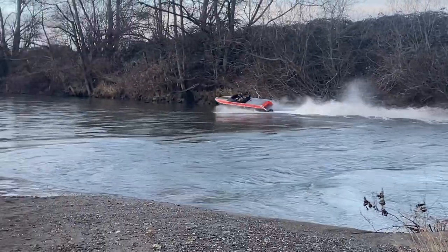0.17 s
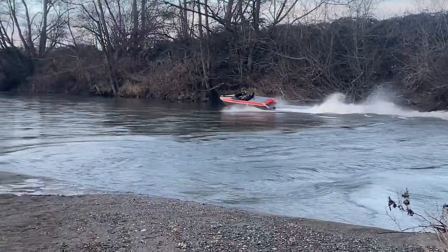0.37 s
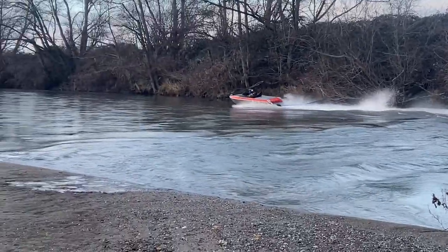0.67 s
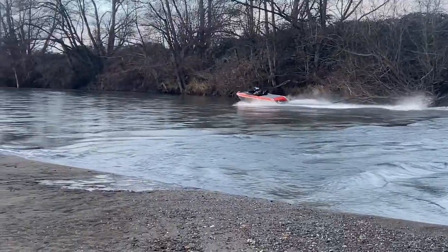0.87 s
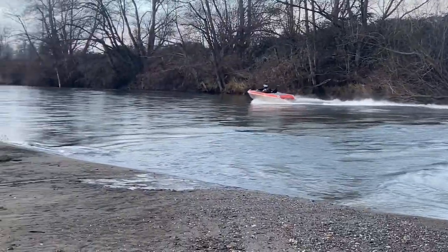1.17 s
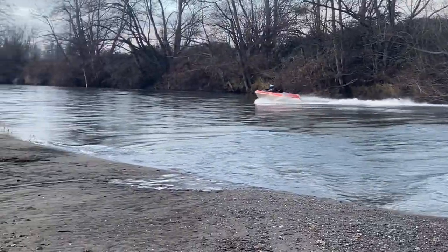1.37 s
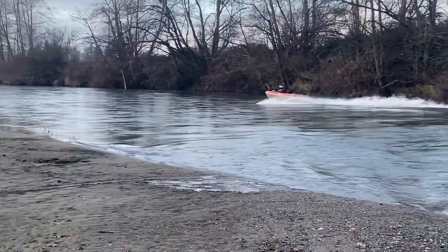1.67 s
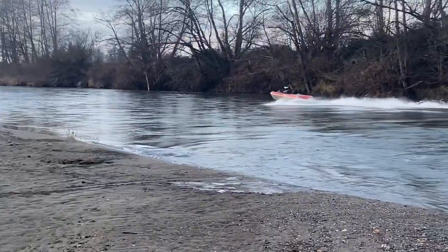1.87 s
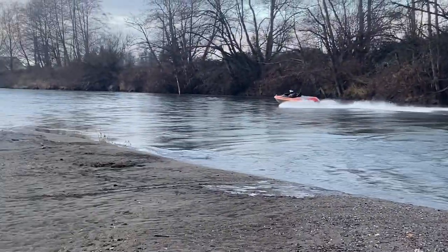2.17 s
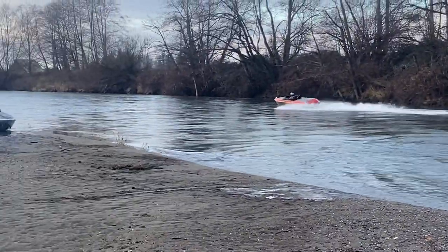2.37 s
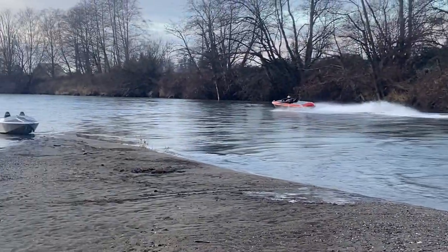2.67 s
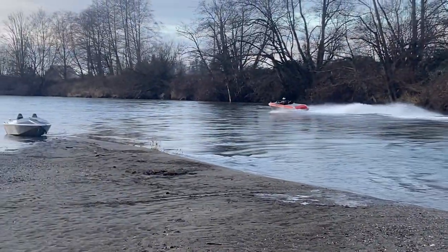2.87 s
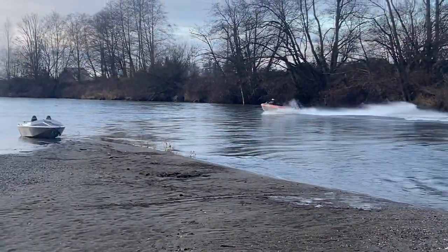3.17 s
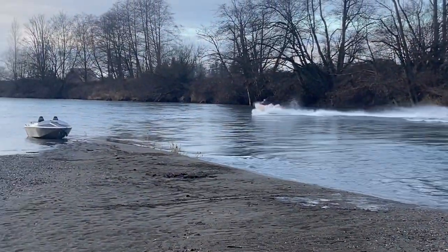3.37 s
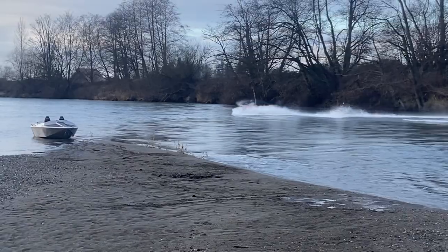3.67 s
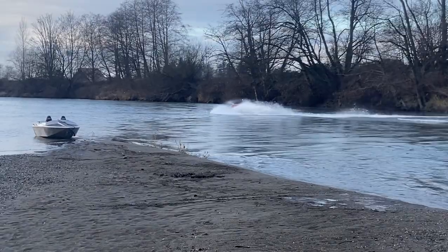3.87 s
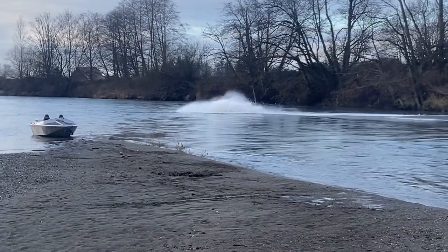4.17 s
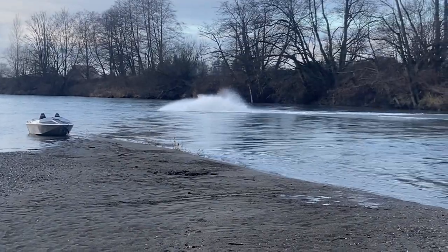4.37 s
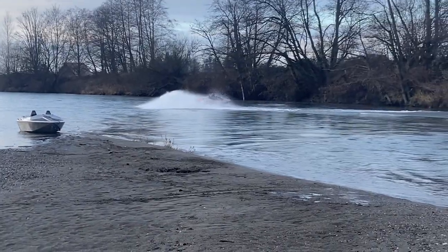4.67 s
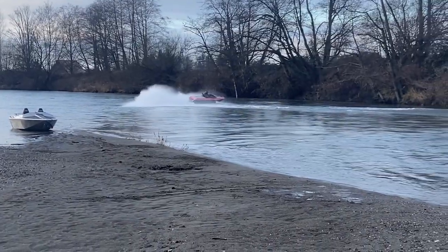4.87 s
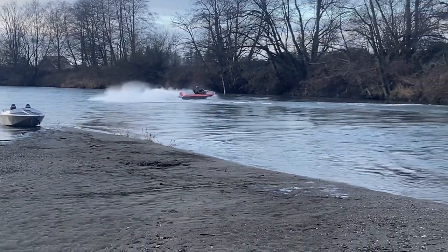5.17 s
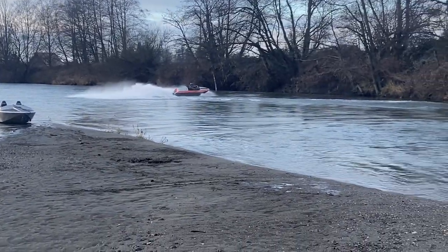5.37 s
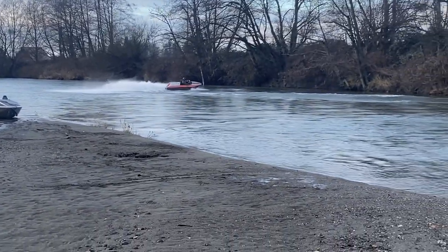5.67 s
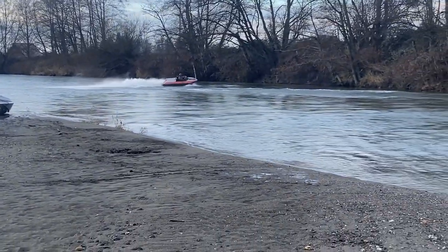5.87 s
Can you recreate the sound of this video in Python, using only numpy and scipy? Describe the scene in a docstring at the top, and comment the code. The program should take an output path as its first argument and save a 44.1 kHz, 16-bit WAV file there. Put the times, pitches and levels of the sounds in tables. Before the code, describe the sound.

Low, buzzing boat engine with watery burble hums steadily, surges in two throaty revs amid hissing spray, then drops to a steady run.

```python
"""A small jet boat runs along a river, revs up through a spinning turn and heads back, heard from a gravel bank.
Its exhaust is a stack of harmonics of the firing rate, roughened by unequal firings; sparse impacts
coloured low make its underwater burble, with a gulp at each plunge of the outlet.
Shaped noise gives the churning jet, the spray, the thrown sheets of water and the current over near stones.
The wooded far bank answers softly with a diffuse echo; a phone's stereo processing makes two channels of it."""
import sys
import numpy as np
from scipy import signal
from scipy.fft import rfft, irfft
from scipy.io import wavfile

SR = 44100
rng = np.random.default_rng(int(sys.argv[2]) if len(sys.argv) > 2 else 0)


def waveform_to_disk(signal):
    """Save audio, clipped to [-1, 1], as 16-bit WAV at the path in sys.argv[1]."""
    frames = np.transpose(np.atleast_2d(signal))
    scaled = np.clip(frames, -1, 1) * 32767
    samples = np.round(scaled).astype(np.int16)
    wavfile.write(sys.argv[1], SR, samples)


N = 265923
TIME = np.arange(N) / SR  # s
BINS = np.fft.rfftfreq(N, 1 / SR)  # Hz

# exhaust gas breaking through the water, before small trims: t/s, level/dB
BURBLE_LEVEL = [(0, -39.5), (.55, -32.5), (1.78, -39.5), (2.1, -33), (3.45, -28.5), (4.1, -33.5),
                (4.7, -26), (5.3, -32.5), (6.03, -30.5)]
# the outlet plunges under water and gulps: t/s, level/dB
PLUNGES = [(.56, -28), (2.6, -29.5), (3.03, -27), (3.47, -25), (3.78, -29), (4.76, -25), (5.14, -26),
           (5.66, -29)]
GULP_HALF_S = 0.024  # half length of a gulp, s


def amp(db):
    """Decibels to gain."""
    return 10 ** (np.asarray(db) / 20)


def unit(x):
    """Scales to rms 1."""
    return x / np.sqrt(np.mean(x ** 2) + 1e-20)


def curve(rows):
    """Reads a time table at every sample."""
    return np.interp(TIME, *np.transpose(rows))


def read(points, hz):
    """Reads a spectrum table on a log-frequency axis."""
    f, value = np.transpose(points)
    return np.interp(np.log(hz + 1), np.log(f + 1), value)


def colour(x, points):
    """Filters x by a spectrum table and scales it to rms 1."""
    spectrum = rfft(x) * amp(read(points, BINS))
    return unit(irfft(spectrum, N))


def bump(s, half_s):
    """A smooth swell of height 1 around one moment."""
    return np.exp(-((TIME - s) / half_s) ** 2)


def wander(rate_hz):
    """Slow random drift of rms 1: white noise rolled off above rate_hz."""
    spectrum = rfft(rng.standard_normal(N)) / (1 + (BINS / rate_hz) ** 4)
    return unit(irfft(spectrum, N))


def noise():
    """Two unrelated white noises: one that both channels share, one that sets them apart."""
    return rng.standard_normal((2, N))


def drops(per_s, spread_db):
    """Sparse impacts of random sign, a few of them large."""
    size = amp(spread_db * np.minimum(rng.exponential(1, (2, N)), 4))
    sign = np.sign(noise())
    struck = rng.random((2, N)) < per_s / SR
    return unit(size * sign * struck)


def far_bank(x, delay_s=0.06, t60_s=0.81):
    """Trunks and brush across the river scatter the engine back as a soft, diffuse tail."""
    t = TIME[:SR] - delay_s
    decay = (t > 0) * amp(-60 * abs(t) / t60_s)
    scattered = rng.random((2, SR)) < 1500 / SR  # about 1500 reflections a second
    taps = rng.standard_normal((2, SR)) * scattered * decay
    taps = taps / np.linalg.norm(taps[0])
    return signal.fftconvolve(x[None], taps, axes=1)[:, :N]


def ripples():
    """Shallow current fizzing over the gravel close by: noise with many small impacts."""
    # ripples on the near stones, before a 1.5 dB cut: t/s, level/dB
    ripple_level = [(0, -45), (.36, -45), (.5, -50), (1, -54), (3, -55.5), (6.03, -63.5)]
    # colour of the fizz: f/Hz, level/dB
    ripple_colour = [(300, -7.5), (1000, 2.5), (2200, -3.5), (3000, 0.5), (5300, 0), (7600, -1.5),
                     (9600, -7.5), (11200, -15), (14000, -21), (15700, -25.5)]
    fizz = noise() + 0.45 * drops(per_s=1600, spread_db=3.5)
    return colour(fizz, ripple_colour) * amp(curve(ripple_level) - 1.5)


def spray():
    """Countless far drops fall back on the river and merge into a hiss."""
    # hiss of the spray: t/s, level/dB
    spray_level = [(0, -47.3), (.9, -49.7), (2.7, -47.8), (3.0, -44.6), (3.68, -47), (3.92, -43.3),
                   (4.38, -47), (4.67, -44.5), (5.4, -45.5), (6.03, -48)]
    # colour of the hiss: f/Hz, level/dB
    spray_colour = [(400, -21), (1400, -8), (1900, -3), (2300, -4), (2650, 3), (3100, 2.5), (4200, -3),
                    (5200, -3.5), (6600, -11), (8000, -14.5), (9600, -19.5), (11000, -27), (14000, -33)]
    hiss = noise() + 0.35 * drops(per_s=2300, spread_db=3)
    return colour(hiss, spray_colour) * amp(curve(spray_level) + 0.52 * wander(15))


def splashes():
    """Each thrown sheet of water swells and fades in its own band of noise."""
    # sheets of water thrown up: t/s, half length/s, level/dB, centre f/Hz
    sheets = [(2.878, 0.17, -40, 940), (3.005, .14, -50, 5200), (3.328, 0.083, -52.5, 5200),
              (3.751, 0.27, -49.5, 1500), (3.914, 0.098, -52.5, 5400), (4.157, 0.054, -47.5, 4850),
              (4.099, 0.092, -46, 1100), (4.68, 0.15, -49.5, 1375)]
    out = np.zeros((2, N))
    for s, half_s, db, hz in sheets:
        band = np.exp(-(np.log2((BINS + 1) / hz) / 0.32) ** 2)  # width in octaves
        sheet = unit(irfft(rfft(noise()) * band, N))
        out += amp(db) * bump(s, half_s) * sheet
    return out


def churn(turns):
    """The roar of the jet: broad noise that throbs slightly with each firing."""
    # churning of the jet, strongest in the turn and at the end: t/s, level/dB
    churn_level = [(0, -39.8), (1.1, -39.7), (1.5, -41), (2.45, -41.7), (2.95, -37.8), (4.65, -38.5),
                   (5.2, -43.3), (6.03, -38)]
    # colour of the roar: f/Hz, level/dB
    churn_colour = [(40, -14), (150, 3.5), (300, 7), (500, 4), (700, 4.5), (1000, -1), (1300, -2.5),
                    (1650, -12.5), (2000, -17.5), (5000, -41.5)]
    throb = 1 + 0.24 * np.cos(turns)
    return colour(noise() * throb, churn_colour) * amp(curve(churn_level) + 0.8 * wander(10))


def burble():
    """Low, lumpy puffs of gas bursting out of the wake, with a short gulp at each plunge."""
    # colour of the puffs: f/Hz, level/dB
    burble_colour = [(15, -41.5), (30, -16.5), (45, -4), (65, 2), (90, 0.5), (125, 1.5), (200, -3.5),
                     (280, -8.5), (420, -16), (800, -34), (2000, -63.5)]
    puffs = colour(drops(per_s=300, spread_db=2), burble_colour)
    steady = amp(curve(BURBLE_LEVEL) + 1.2 + 1.5 * wander(6))
    gulps = sum(amp(db) * bump(s, GULP_HALF_S) for s, db in PLUNGES)
    return puffs * np.hypot(steady, gulps)


def lope(turns, hz):
    """Strong and weak firings alternate, which adds lines halfway between the harmonics."""
    # lope of the unequal cylinders as it stands at cruising speed: t/s, level/dB
    lope_level = [(0, -38), (2.45, -31.7), (3.6, -32), (5.3, -39), (6.03, -41)]
    # colour of the half-order lines: f/Hz, level/dB
    lope_colour = [(72, -13.5), (218, 1), (365, -12.5), (510, -18), (660, -23), (950, -26.5), (1500, -35)]
    cruise_hz, db_per_octave = 145, -33  # it evens out as the engine speeds up
    out = np.zeros(N)
    for k in np.arange(0.5, 8):
        level_db = read(lope_colour, k * hz) + 2.6 * wander(6)
        phase = k * turns + 0.3 * wander(12) + rng.uniform(0, 2 * np.pi)
        out += amp(level_db) * np.cos(phase)
    return np.sqrt(2) * amp(curve(lope_level) + db_per_octave * np.log2(hz / cruise_hz)) * out


def fading(order):
    """The dB that one harmonic loses while direct and reflected sound briefly cancel."""
    # cancellations: t/s, half length/s, depth/dB, harmonic number
    fades = [(0.129, .03, 14, 1), (.26, .02, 6, 1), (2.002, .035, 8.5, 1), (2.174, 0.026, 9, 1),
             (2.86, .018, 7, 1), (3.314, 0.024, 8, 1), (3.46, .015, 8, 1), (3.79, .017, 11, 1),
             (3.87, .025, 9, 1), (5.68, .03, 8, 1), (.11, .035, 10, 2), (0.598, 0.18, 6, 2),
             (1.14, 0.079, 20, 2), (1.487, .05, 12, 2), (2.13, .03, 9, 2), (2.71, .08, 22, 2),
             (3.334, 0.042, 8, 2), (3.5, .04, 12, 2), (5.29, 0.081, 14, 2), (5.516, 0.046, 9.5, 2),
             (5.87, 0.052, 13.5, 2), (3.5, .04, 10, 3), (1.55, .25, 11, 4), (.15, .08, 14, 5)]
    return sum(depth_db * bump(s, half_s) for s, half_s, depth_db, k in fades if round(k) == order)


def exhaust(turns, hz):
    """Harmonics of the firing rate; they shake when the outlet burbles under water."""
    # boom at the firing rate, swelling as the boat passes and turns: t/s, level/dB
    boom_level = [(0, -24), (.38, -27), (.64, -24.5), (.8, -21), (1.5, -15.2), (2.08, -21.5), (2.3, -34),
                  (2.58, -19.5), (2.78, -20.5), (2.95, -12), (3.1, -9.8), (3.46, -17), (3.72, -14),
                  (3.95, -21), (4.4, -9.4), (5.0, -15.7), (6.03, -21.5)]
    # bark of the open outlet, an octave up: t/s, level/dB
    bark_level = [(0, -33), (.9, -30.5), (2.3, -31.5), (3.0, -27), (3.5, -28), (3.95, -24.5), (4.45, -24),
                  (5.2, -34), (6.03, -31)]
    # snarl under load, on the third harmonic: t/s, level/dB
    snarl_level = [(0, -37.5), (.9, -40.5), (1.85, -54), (2.16, -38.5), (3.3, -38), (4.05, -32.3),
                   (4.55, -37), (4.85, -49), (6.03, -48.5)]
    # rasp of the fourth harmonic and up, before the pipe and a 1 dB cut: t/s, level/dB
    rasp_level = [(0, -42.5), (.8, -47), (1.4, -46), (1.95, -51.5), (2.95, -40.5), (3.4, -45), (3.55, -51),
                  (4.35, -50.5), (4.7, -58), (6.03, -49.5)]
    # how the pipe dulls the rasp: f/Hz, gain/dB
    pipe_gain = [(580, 0), (750, -2), (900, -8), (1130, -14), (1300, -23), (2000, -33)]
    # the outlet lifts clear of the water and the overtones flare: t/s, half length/s, gain/dB
    flares = [(.18, .07, 3), (0.89, .13, 4), (1.74, .1, 2.5), (2.267, 0.055, 3.5), (2.72, .09, 4),
              (2.96, .06, 3.5), (3.42, .03, 7), (3.97, 0.16, 3), (4.362, 0.055, 6), (5.32, .05, 5)]

    gulp_shake = 1 + 1.5 * sum(bump(s, GULP_HALF_S) for s, _ in PLUNGES)
    shake = amp(0.5 * (curve(BURBLE_LEVEL) + 35)) * gulp_shake
    flare_db = sum(db * bump(s, half_s) for s, half_s, db in flares)

    boom_db = curve(boom_level) - fading(order=1) + 0.6 * shake * wander(18)
    bark_db = curve(bark_level) + flare_db - fading(order=2) + 1.2 * shake * wander(12)
    snarl_db = curve(snarl_level) + flare_db - fading(order=3) + 1.6 * wander(8)
    out = amp(boom_db) * np.cos(turns + 0.045 * shake * wander(18))
    out += amp(bark_db) * np.cos(2 * turns + rng.uniform(0, 2 * np.pi))
    out += amp(snarl_db) * np.cos(3 * turns + rng.uniform(0, 2 * np.pi))
    # the high harmonics fade in and out one by one over the moving water
    for k in np.arange(4, 9):
        rasp_db = curve(rasp_level) + flare_db - fading(order=k)
        rasp_db += read(pipe_gain, k * hz) + 2.5 * wander(6.5) - 1.0
        phase = k * turns + 0.18 * shake * wander(24) + rng.uniform(0, 2 * np.pi)
        out += amp(rasp_db) * np.cos(phase)
    return np.sqrt(2) * out


def stereo_processing(pair):
    """The phone's stereo processing makes two nearly alike channels, shifted in phase and level."""
    # how alike the channels are: f/Hz, likeness (0 to 1)
    likeness = [(48, 0.93), (80, .9), (160, 0.92), (700, 0.92), (1200, 0.93), (1550, 0.25), (1950, 0.98),
                (3000, 0.94), (3500, 1)]
    # level between the channels: f/Hz, left minus right/dB
    tilt = [(100, 1), (170, 1.8), (290, 0.8), (550, 1.8), (750, 1.4), (900, 3.5), (1300, 3), (1600, 6.5),
            (1900, 0)]
    # phase by which the left channel leads: f/Hz, lead/rad
    lead = [(750, 0), (1150, -.7), (1650, -1.1), (2050, 0), (2900, .4), (3500, 0), (7450, 0), (8950, -3.1),
            (11100, -6.3), (11600, -6.3), (12600, -9.4), (13700, -9.4), (14600, -12.6)]
    shared, apart = rfft(pair)
    same = np.clip(read(likeness, BINS), 0, 1)
    shared = shared * np.sqrt((1 + same) / 2)
    apart = apart * np.sqrt((1 - same) / 2)
    # each channel takes half of the level and phase difference
    lean = amp(read(tilt, BINS) / 2) * np.exp(0.5j * read(lead, BINS))
    left, right = (shared + apart) * lean, (shared - apart) / lean
    return irfft(np.array([left, right]), N)


def scene():
    """The engine and its echo over the sounds of the water."""
    # engine speed, cruise, two revs through the turn, a slightly faster run back: t/s, firing rate f/Hz
    firing_rate = [(0.0, 144.7), (0.17, 143.7), (0.56, 147.3), (2.71, 143.9), (2.8, 150.3), (2.91, 183.4),
                   (3.02, 199.8), (3.21, 182.5), (3.35, 195.4), (3.43, 190.5), (3.51, 153.8), (3.69, 146.7),
                   (3.85, 174.9), (4.03, 181.9), (4.17, 186.0), (4.53, 190.4), (4.72, 189.8), (4.96, 160.4),
                   (5.29, 154.3), (6.03, 157.1)]
    hz = curve(firing_rate) * (1 + 0.0015 * wander(25))
    turns = 2 * np.pi * np.cumsum(hz) / SR  # firing phase, rad
    engine = exhaust(turns, hz) + lope(turns, hz)
    direct = np.array([engine, np.zeros(N)])  # a point source: all shared, nothing apart
    echo = amp(-23.5) * far_bank(engine)
    water = ripples() + spray() + splashes() + churn(turns) + burble()
    edges = signal.windows.tukey(N, 256 / N)  # very short fades at both ends
    return stereo_processing((direct + echo + water) * edges)


def record(dry):
    """The recorder's band limit: a steep low-pass at 15.6 kHz."""
    lowpass = signal.firwin(511, 15600, window=("kaiser", 9), fs=SR)
    return signal.oaconvolve(dry, lowpass[None], "same")


dry = scene()
out = record(dry)
waveform_to_disk(out)
```